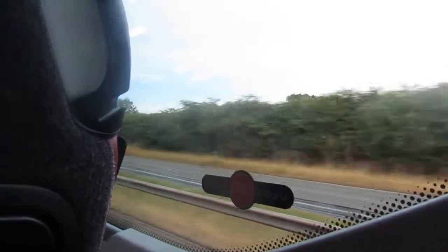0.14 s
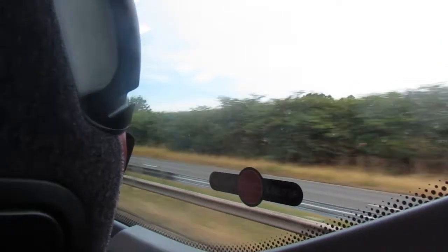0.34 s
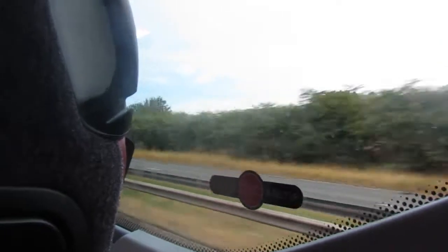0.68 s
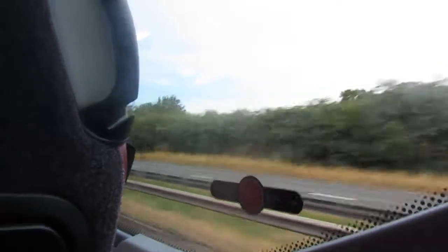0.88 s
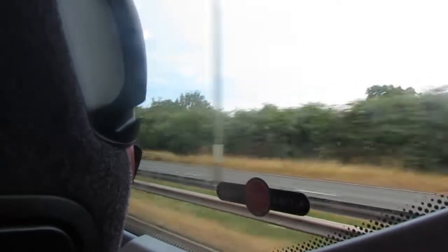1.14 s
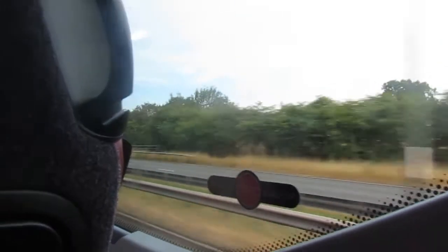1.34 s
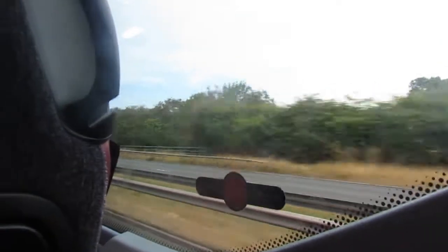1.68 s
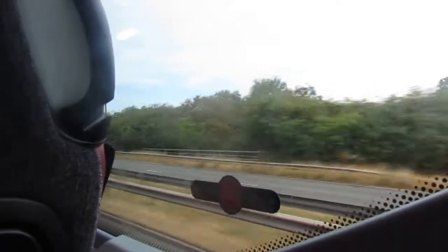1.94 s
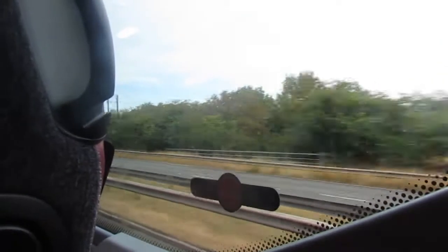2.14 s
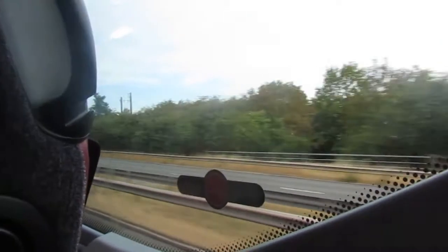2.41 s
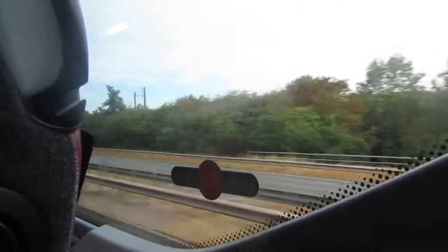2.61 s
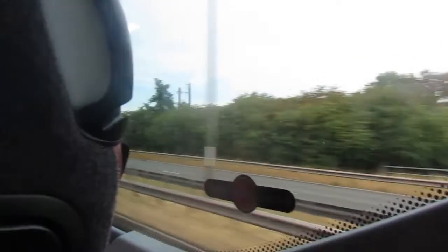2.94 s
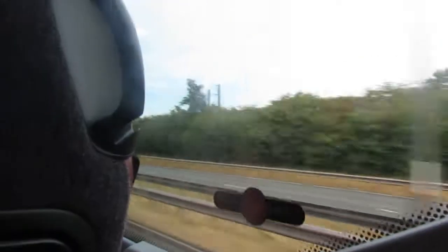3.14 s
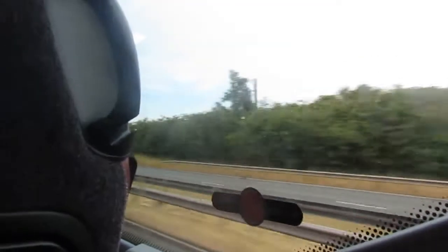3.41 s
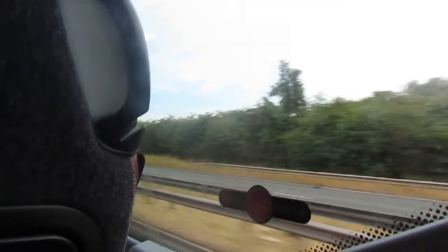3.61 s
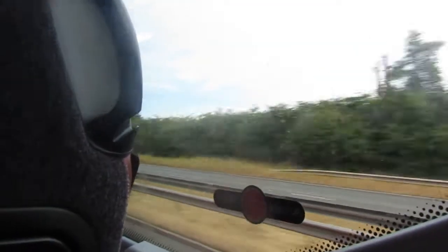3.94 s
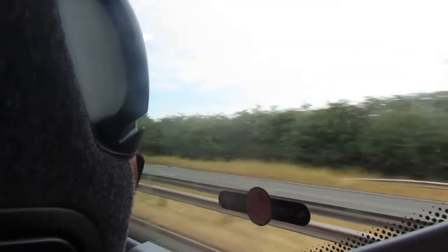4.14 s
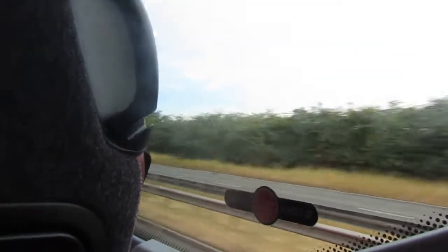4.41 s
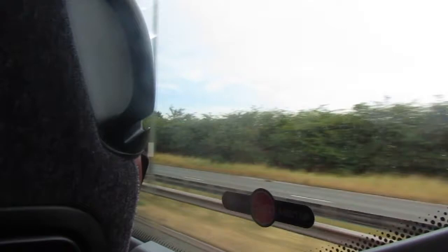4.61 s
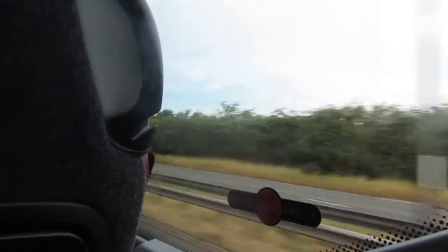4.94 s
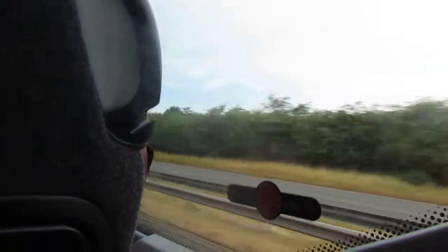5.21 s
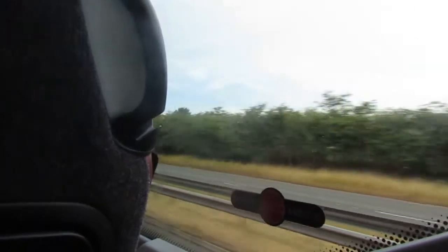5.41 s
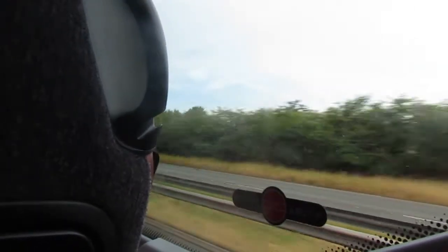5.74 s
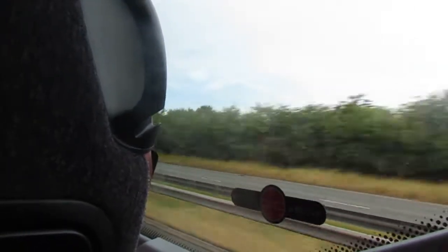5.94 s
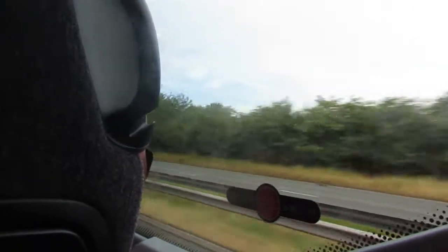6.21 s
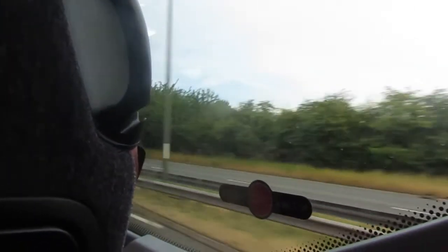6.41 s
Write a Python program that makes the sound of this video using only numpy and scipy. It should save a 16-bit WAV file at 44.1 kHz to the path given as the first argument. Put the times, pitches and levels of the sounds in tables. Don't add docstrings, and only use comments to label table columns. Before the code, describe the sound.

From 0 to about 6.6 seconds, the enclosed cabin of a coach cruising at steady speed. The low diesel drone dominates, a smooth throbbing hum around 70 to 140 Hz, with deep uneven body rumble beneath and dull tyre roar in the middle. Wheel and shaft hums thicken it; axle gears and alternator add a thin, nearly constant whine, strongest around 450 to 950 Hz. Soft air hiss runs along the glass. Gear hum near 600 Hz eases around 0.75 s, recovers by 1.75, swells towards 3.75 and stays fuller, easing slightly at the end. Small dry trim ticks fall irregularly, clearer near 0.6, 2.35, 2.7, 3.4, 3.9, 5.05 and 6.4 s, with faint sizzle and rattling. At about 4.3 s a barely audible high seal whistle enters, then fades fainter after 4.8. Close mono microphone by the window, slightly grainy, limited treble.

```python
import sys
import numpy as np
from scipy import signal
from scipy.fft import rfft, irfft, dct, next_fast_len
from scipy.io import wavfile
from scipy.ndimage import uniform_filter1d, map_coordinates

SR = 44100
rng = np.random.default_rng(int(sys.argv[2]) if len(sys.argv) > 2 else 0)


def generate_wav(sig):
    pcm = np.round(np.clip(np.atleast_2d(sig).T, -1, 1) * 32767).astype(np.int16)
    wavfile.write(sys.argv[1], SR, pcm)


def how_loud(loudness_db):
    steps = np.asarray(loudness_db, float) / 20
    return 10 ** steps


N = 290178

# (frequency [Hz], level [dB per Hz])
RUMBLE = [(6, -58), (10, -4.5), (18, 0), (24, -6), (35, -2), (55, -3), (80, -7), (130, -7.5), (170, -13.5),
          (200, -11), (290, -18), (400, -21), (500, -77.5)]
# (frequency [Hz], level [dB per Hz])
TYRE_ROAR = [(150, -54), (260, -3.5), (330, -4.5), (430, -6), (480, -1), (530, 1), (640, -0.5), (720, -6.5),
             (900, -7), (1000, -17), (1200, -17), (1600, -73)]
# (frequency [Hz], level [dB per Hz])
AIR_HISS = [(700, -37), (1000, 1), (1200, -6), (1350, -1.5), (1500, -4.5), (2000, -12), (2800, -13),
            (3080, -17.5), (3300, -10.5), (3450, -15), (4500, -21), (5500, -25), (6200, -28.5), (7000, -60)]
# (frequency [Hz], level [dB per Hz])
SIZZLE = [(5000, -37.5), (5900, -2.5), (6600, -0.5), (7300, -1), (7700, -10.5), (8000, -6), (9200, -8),
          (10100, -10.5), (10400, -60)]
# (time [s], peak level [dB], panel thud level [dB], dullness [-1 to 1])
TICKS = [(0.5727, -46, -42, 0), (0.607, -36, -48, 0), (1.1, -51, -48.5, .3), (1.6024, -46, -45.5, -0.4),
         (2.099, -48.5, -49, 0), (2.35, -38, -43, 0), (2.3818, -44, -42.5, 0), (2.5578, -49, -40.5, 0),
         (2.7053, -55, -43.5, 0), (2.741, -48.5, -33.5, 0), (3.021, -48, -46, 0), (3.15, -51, -48, 0),
         (3.358, -49, -43.5, 0), (3.4346, -37.5, -41, 0.4), (3.76, -49.5, -49, -.3),
         (3.9389, -38, -40.5, 0), (4.1395, -45, -44.5, .3), (4.3896, -46, -44.5, -0.1),
         (4.8276, -51.5, -41.5, 0), (5.031, -48, -44, .6), (5.06, -42, -46, .9), (6.1294, -45, -44, .6),
         (6.3974, -46.5, -37.5, -.6)]
# (frequency [Hz], width [Hz], level [dB])
TRIM_RINGS = [(4970, 440, -4.5), (6400, 770, 1.5), (7500, 310, -1.5), (8370, 1200, -2.5), (9200, 670, -3)]
# (frequency [Hz], level [dB rms])
SHAFTS = [(30.7, -31), (38.7, -27), (66, -27), (212, -40), (246, -41), (262.3, -35), (278, -41),
          (282.7, -40), (312, -40), (366.3, -42), (531.3, -44), (539.7, -43), (553, -44), (564.7, -44),
          (625.7, -45), (1333.3, -56)]
# (multiple of its base tone [-], level [dB rms])
ALTERNATOR = [(2, -47), (3, -44), (4, -45), (5, -58), (6, -58), (10, -58), (12, -68)]
# (multiple of half the gear mesh tone [-], level [dB rms])
AXLE_GEAR = [(1, -38.5), (2, -36.5), (4, -60)]
# (multiple of the engine cycle [-], level [dB rms])
VALVE_GEAR = [(65, -52), (66, -49), (107, -58), (146, -65), (185, -65), (187, -66), (216, -70)]
# (frequency [Hz], level of each order [dB])
CLATTER = [(300, -57.5), (600, -67), (1000, -55.5), (1200, -62), (1300, -57), (1500, -65), (2200, -67.5),
           (3000, -79.5), (4000, -100)]
# (multiple of the four-stroke cycle [-], level [dB rms])
ENGINE = [(6, -20.5), (8, -36), (9, -23), (10, -30), (11, -39), (12, -24), (13, -37), (14, -40), (15, -42),
          (16, -38), (19, -39), (21, -33), (22, -43), (23, -43), (24, -36), (26, -35), (28, -44), (29, -45),
          (30, -36), (35, -49), (36, -46), (41, -50), (42, -43), (45, -47), (50, -48), (68, -49), (78, -51),
          (84, -55), (108, -56)]
# (depth [Hz], period [s], fastest at [s])
SPEED_SWINGS = [
    (.52, 5.8, .05),
    (.44, 1.0, .2),
]
# (time [s], level over the mean [dB])
LOAD = [
    (0, -2.5),
    (.75, -5),
    (1.75, 0),
    (2.3, -2),
    (3.2, .5),
    (3.75, 4),
    (5.3, 3.5),
    (6.58, 1),
]
# (frequency [Hz], step [dB])
CAMERA_STEP = [(100, -24), (1000, -33), (2500, -38), (4300, -41), (5400, -39), (6800, -38), (7500, -40.5),
               (7680, -41), (7700, -20), (7900, -20), (7920, -43), (8200, -44), (10100, -44), (10400, -20)]

CYCLE_HZ, ALTERNATOR_HZ, MESH_HZ = 11.870, 230.77, 909.86
TIMING_DB = -33
RUMBLE_DB, ROAR_DB, AIR_DB = -18.5, -28, -39
ROAR_PER_LOAD = 0.11
WHISTLE_HZ, WHISTLE_DB, WHISTLE_AFTER_DB = 8727, -70, -80
WHISTLE_ON_S, WHISTLE_RISE_S, WHISTLE_HOLD_S, WHISTLE_FALL_S = 4.3, .15, .35, .2
BUZZ_DB = -62.5
SHAKE_DB, SHAKE_PER_DB, SHAKE_S = -65.5, 0.4, .05
RATTLES_PER_S, RATTLE_DB, RATTLE_SCATTER_DB = 9, -50, 3.5
RATTLE_HZ, RATTLE_T60_S = 3300, .07


def along(points, hz):
    f, v = np.transpose(points)
    return np.interp(np.log(hz + 1), np.log(f + 1), v)


def unit(x):
    return x / np.sqrt(np.mean(x ** 2) + 1e-20)


def wobble(rate):
    knots = rng.standard_normal(int(N * rate / SR) + 4)
    return map_coordinates(knots, [np.arange(N) * rate / SR])


def filtered(x, response):
    m = next_fast_len(N + SR // 2)
    return irfft(rfft(x, m) * response(np.fft.rfftfreq(m, 1 / SR)), m)[:N]


def rush(spectrum, patchy_db):
    z = signal.stft(rng.standard_normal(N), nperseg=512)[2]
    patches = uniform_filter1d(rng.standard_normal(z.shape), size=5, axis=0)
    patches = uniform_filter1d(patches, size=10, axis=1)
    x = signal.istft(z * how_loud(patchy_db * unit(patches)), nperseg=512)[1][:N]
    return unit(filtered(x, lambda hz: how_loud(along(spectrum, hz))))


def climb():
    times, load_db = np.transpose(LOAD)
    return np.interp(np.arange(N) / SR, times, load_db)


def travel():
    t = np.arange(N) / SR
    swing_hz = sum(depth * np.cos(2 * np.pi * (t - peak) / period) for depth, period, peak in SPEED_SWINGS)
    return np.cumsum(1 + swing_hz / MESH_HZ) / SR


def tones(base_hz, rows, sway_db, drift, count=0):
    turn = 2 * np.pi * base_hz * travel() + .5
    total = np.zeros(N)
    for k, db in rows:
        level = np.sqrt(2) * how_loud(db + sway_db * wobble(3.01))
        together = k <= count and k % 3 == 0
        start = 0 if together else rng.uniform(0, 2 * np.pi)
        total += level * np.cos(k * turn + start + drift * wobble(4))
    return total


def road():
    uneven = wobble(8)
    rumble = how_loud(RUMBLE_DB + 0.67 * uneven) * rush(RUMBLE, patchy_db=0.97)
    roar_db = ROAR_DB + ROAR_PER_LOAD * climb() + .6 * uneven + .6 * wobble(4)
    return rumble + how_loud(roar_db) * rush(TYRE_ROAR, patchy_db=0.24)


def air():
    return how_loud(AIR_DB + .3 * wobble(3) + 0.15 * wobble(9.1)) * rush(AIR_HISS, patchy_db=1.0)


def whistle():
    times = WHISTLE_ON_S + np.cumsum([0, WHISTLE_RISE_S, WHISTLE_HOLD_S, WHISTLE_FALL_S])
    level_db = np.interp(np.arange(N) / SR, times, [-88, WHISTLE_DB, WHISTLE_DB, WHISTLE_AFTER_DB])
    return how_loud(level_db) * np.sin(2 * np.pi * WHISTLE_HZ * travel())


def rattle():
    taps, t = np.zeros(N), np.arange(SR // 10) / SR
    when, size = rng.random((round(RATTLES_PER_S * N / SR), 2)).T
    taps[(when * N).astype(int)] = how_loud(RATTLE_DB - RATTLE_SCATTER_DB * np.log(size + .02))
    fade = how_loud(-60 * t / RATTLE_T60_S) * (1 - np.exp(-t / .006))
    return signal.fftconvolve(taps, np.sin(2 * np.pi * RATTLE_HZ * t) * fade)[:N]


def buzz():
    t = np.arange(N) / SR
    shaken = np.zeros(N)
    for s, db, *_ in TICKS:
        shaken += how_loud(2 * (SHAKE_DB + SHAKE_PER_DB * (db + 44.5))) * np.exp(-((t - s) / SHAKE_S) ** 2)
    resting = how_loud(2 * BUZZ_DB + 1.2 * wobble(4))
    return np.sqrt(resting + shaken) * rush(SIZZLE, patchy_db=.8)


def trim_panel(f):
    return sum((-1) ** k * how_loud(db) * 1j * f * width / (centre ** 2 - f * f + 1j * f * width)
               for k, (centre, width, db) in enumerate(TRIM_RINGS))


def thud_body(f):
    return (1j * f * 3000 / (2900 ** 2 - f * f + 1j * f * 3000)) ** 2


def trim():
    crack, thud, t = np.zeros(N + SR), np.zeros(N + SR), np.arange(SR // 10) / SR
    crack_fade = how_loud(-60 * t / .022) + .12 * how_loud(-60 * t / .15)
    for s, db, thud_db, dull in TICKS:
        snap, knock = rng.standard_normal((2, len(t)))
        snap = snap + dull * np.roll(snap, 2)
        here = slice(round(s * SR), round(s * SR) + len(t))
        crack[here] += how_loud(db + 6) * crack_fade * snap
        thud[here] += how_loud(thud_db - 60 * t / 0.36) * knock
    return filtered(crack[:N], trim_panel) + filtered(thud[:N], thud_body)


def shafts():
    return how_loud(-1.0) * tones(0.99, SHAFTS, sway_db=2.0, drift=0.84)


def whine():
    gear = tones(MESH_HZ / 2, AXLE_GEAR, sway_db=.6, drift=.2)
    alternator = tones(ALTERNATOR_HZ, ALTERNATOR, sway_db=-0.1, drift=0.33)
    return how_loud(0.9) * (gear + alternator)


def timing_gears():
    return how_loud(TIMING_DB + climb()) * tones(CYCLE_HZ, [(52, -.5)], sway_db=1.2, drift=.45)


def clatter():
    order = np.arange(2048 + 1)
    scatter_db = 2.4 * np.clip(rng.standard_normal(len(order)), -3, 1.2)
    level = how_loud(along(CLATTER, order * CYCLE_HZ) + scatter_db)
    cycle = irfft(level * np.exp(2j * np.pi * rng.random(len(order)))) * 2048 * np.sqrt(2)
    return map_coordinates(cycle, [CYCLE_HZ * travel() % 1 * len(cycle)], mode="grid-wrap")


def engine():
    drone = tones(CYCLE_HZ, ENGINE, sway_db=.6, drift=.25, count=12)
    valves = tones(CYCLE_HZ, VALVE_GEAR, sway_db=1.5, drift=0.56)
    return drone + valves + clatter() + timing_gears()


def scene():
    outside = road() + air() + whistle()
    loose_parts = rattle() + buzz() + trim()
    return (outside + loose_parts + shafts() + whine() + engine())[None]


def camera_rounding(x, size=2048):
    lead = 2 * size - 99
    x = np.pad(x, (lead, 3 * size), mode="reflect", reflect_type="odd")
    window = np.sin(np.pi * (np.arange(2 * size) + .5) / (2 * size))
    frames = np.lib.stride_tricks.sliding_window_view(x, 2 * size)[::size] * window
    a, b, c, d = np.split(frames, 4, axis=1)
    lines = dct(np.hstack([-c[:, ::-1] - d, a - b[:, ::-1]]), type=4, norm="ortho")
    step_db = along(CAMERA_STEP, np.arange(size) * SR / 2 / size)
    step = how_loud(step_db + .6 * rng.standard_normal((len(lines), 1)))
    lines = np.sign(lines) * np.floor(np.abs(lines) / step + .4) * step
    u, v = np.split(dct(lines, type=4, norm="ortho"), 2, axis=1)
    frames = np.hstack([v, -v[:, ::-1], -u[:, ::-1], -u]) * window
    out = np.zeros((len(frames) + 1, size))
    out[:-1] += frames[:, :size]
    out[1:] += frames[:, size:]
    return out.ravel()[lead:lead + N]


def top_cut(x):
    return signal.sosfilt(signal.butter(12, 9880, fs=SR, output="sos"), x)


def record(dry):
    soft = dry[0] / (1 + np.abs(dry[0] / .95) ** 5) ** (1 / 5)
    mix = camera_rounding(soft)[None]
    return top_cut(mix)


dry = scene()
out = record(dry)
generate_wav(out)
```